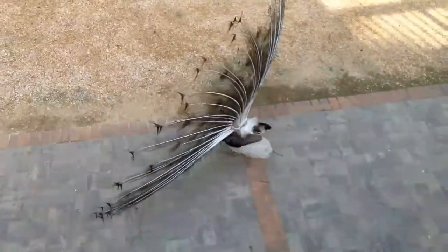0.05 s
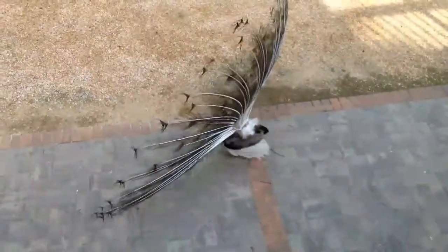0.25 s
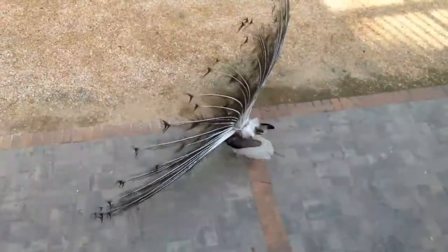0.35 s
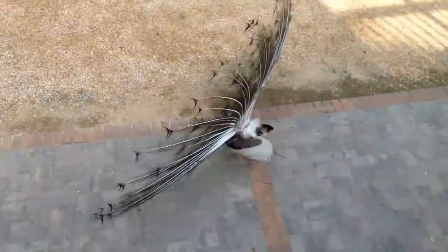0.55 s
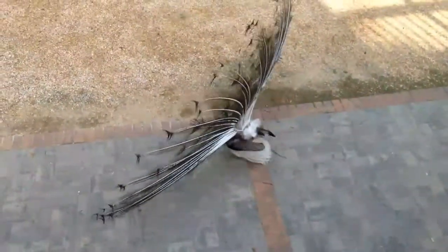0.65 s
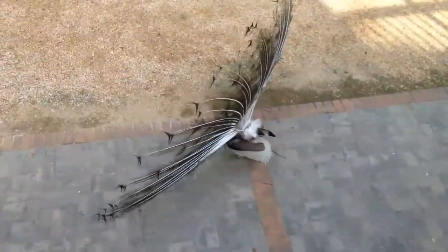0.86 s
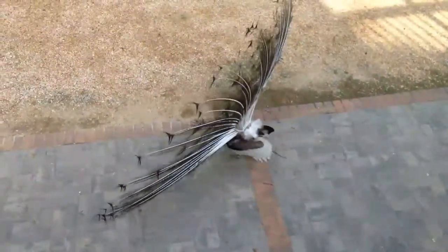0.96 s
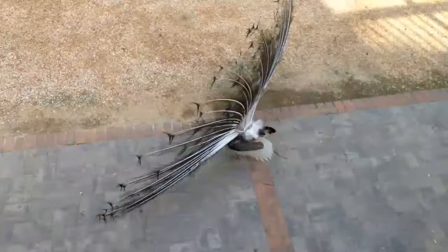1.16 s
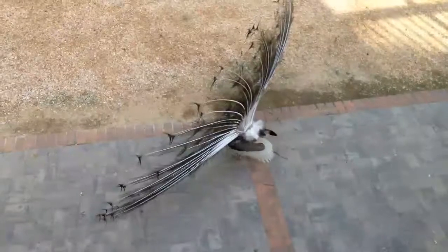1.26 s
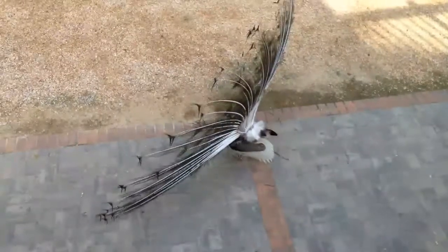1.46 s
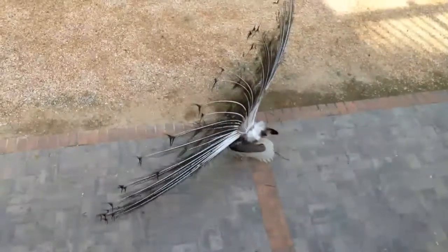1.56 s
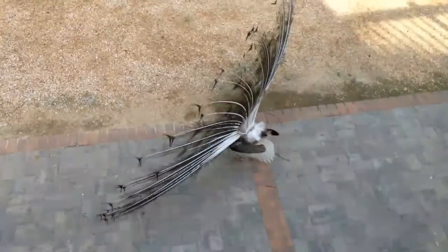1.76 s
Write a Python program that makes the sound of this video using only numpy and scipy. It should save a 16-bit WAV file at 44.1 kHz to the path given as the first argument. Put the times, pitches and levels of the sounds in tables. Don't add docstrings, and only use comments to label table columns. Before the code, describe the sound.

The fading ring of an earlier call opens a paved yard, then one strong, harmonic peacock cry bursts out and echoes away, leaving faint small birds, a late soft coo and low background hum.

```python
import sys
import numpy as np
from scipy import signal
from scipy.fft import rfft, irfft
from scipy.io import wavfile
from scipy.ndimage import uniform_filter1d

SR = 44100
rng = np.random.default_rng(int(sys.argv[2]) if len(sys.argv) > 2 else 0)


def generate_wav(signal):
    frames = np.transpose(np.atleast_2d(signal))
    scaled = np.clip(frames, -1, 1) * 32767
    pcm = np.round(scaled).astype(np.int16)
    wavfile.write(sys.argv[1], SR, pcm)


def magnitude_from_level(level_db):
    exponent = np.asarray(level_db, float) / 20
    return 10 ** exponent


N = 79380

# t/s, f/Hz, level/dB, brightness/(dB per octave), roughness/1
CRY = [
    (.135, 548.5, -36.5, -28, 1.1),
    (.2, 635.9, -19, -29, 0.9),
    (0.272, 704.2, -18, -16, 0.4),
    (0.351, 737, -5, 2.5, .3),
    (0.422, 758.2, -11.5, 7.2, 0.5),
    (.55, 749.9, -5.5, 4.5, 0.1),
    (0.629, 720, -16, 1.5, 0.4),
    (.755, 643.6, -18, 6, .6),
    (0.827, 497.6, -38, -12, 0.9),
]
# f/Hz, width/Hz, level/dB
THROAT = [(720, 790, -16.5), (1158, 163, 4), (1370, 650, -11.5), (1947, 180, 3), (2306.4, 271, 6.88),
          (2580, 114.2, 0), (2794.7, 70, 3), (3224, 200, -6), (3750, 390, -21.5), (4271, 880, -16),
          (6630, 1900, -30), (8860, 1700, -25), (11140, 5300, -35), (13400, 2000, -45.5)]
# t/s, level/dB
ECHOES = [(.0021, -14.5), (.0093, -15.5), (.0167, -17.5), (.0281, -11.5), (.041, -22.5)]
# f/Hz, t60/s
YARD_T60 = [(500, 1), (1300, 0.77), (2100, 0.65), (2800, 0.79), (4500, 0.97), (9000, 0.72), (15000, 0.58)]
# t/s, length/s, start f/Hz, end f/Hz, level/dB
CHIRPS = [(1.12, 0.056, 10250, 10500, -70), (1.133, 0.0099, 6650, 7230, -51.5),
          (1.143, 0.048, 7140, 7175, -55), (1.187, 0.036, 7430, 7240, -69.5),
          (1.369, 0.017, 3900, 4543, -61), (1.447, 0.0209, 4306, 4934, -69.5),
          (1.2, .009, 8150, 9700, -57.5), (1.208, 0.037, 9500, 10000, -70), (1.243, 0.012, 6300, 7300, -64),
          (1.251, 0.074, 7010, 7710, -55), (1.288, 0.033, 3750, 3730, -61),
          (1.424, 0.0267, 3430, 4033, -63.5), (1.641, 0.024, 4060, 4080, -59.5),
          (1.538, 0.0098, 11200, 10200, -81),
          (1.49, .15, 3560, 3690, -68), (1.765, .035, 3700, 4250, -66), (1.77, .026, 6950, 6900, -64),
           (1.17, .03, 3600, 3900, -68)]
# f/Hz, width/Hz, level/dB
HUM = [(217.7, 8, -64), (125.8, 12, -72.5)]
# f/Hz, level/dB
TOWN = [(30, -57.5), (100, -9.5), (200, -4.5), (400, -6.5), (900, -12), (3000, -15), (6000, -24),
        (15000, -35)]

START_S, END_S, ATTACK_S, RELEASE_S = 0.1538, 0.803, 0.0034, 0.0042
GLIDE_S, PITCH_WOBBLE = 0.045, 0.0005
JITTER_HZ, JITTER_RAD, JITTER_PARTIAL = 70, 0.035, 9
BREATH_DB, BRIGHT_FROM_HZ = -48, 7100
LEVEL_WOBBLE_DB, UPPER_WOBBLE_DB = 1.5, 4
LOWEST_STEADY, STEADY_AT_DB = 0.79, -15.5
BEAM_SHARE, BEAM_FROM_DB = 0.45, -18.5
EARLIER_CRY_S, EARLIER_CRY_DB = 0.94, -3.83
SLAP_DB, SLAP_FIRST_S, SLAP_LAST_S, SLAP_LOW_HZ = -4, 0.006, 0.08, 3800
YARD_DB, YARD_START_S = -11.5, 0.09
FAR_DB, FAR_T60_S, FAR_CUT_HZ = -28, 1.59, 5200
RUSTLE_S, RUSTLE_LENGTH_S, RUSTLE_DB = 1.2, 0.065, -60
RUSTLE_LOW_HZ, RUSTLE_HIGH_HZ = 3500, 10000
CHIRP_EDGE_S, CHIRP_GRAIN_DB, CHIRP_WET_DB, CHIRP_SLAP_DB = 0.004, 4, 8, -2
CHATTER_DB, CHATTER_LOW_HZ, CHATTER_HIGH_HZ, CHATTER_S = -84, 3400, 4600, 0.03
COO_S, COO_HZ, COO_DB, COO_OCTAVE_DB, COO_SWELL_S = 1.556, 392, -59.5, -16, 0.049
TOWN_DB = -58
MIC_LOW_HZ, TOP = 85, 0.97


def drift(rate, size):
    r = np.exp(-2 * np.pi * rate / SR)
    slow = signal.lfilter([1], [1, -2 * r, r * r], rng.standard_normal(size + SR))[SR:]
    return (slow - slow.mean()) / slow.std()


def at_hz(points, hz):
    table_hz, values = np.transpose(points)
    return np.interp(np.log(hz), np.log(table_hz), values)


def edges(t, start, end, attack, release):
    ramp = np.minimum((t - start) / attack, (end - t) / release)
    return np.sin(np.pi / 2 * np.clip(ramp, 0, 1)) ** 2


def bandpass(x, low_hz, high_hz):
    return signal.sosfilt(signal.butter(2, [low_hz, high_hz], "band", fs=SR, output="sos"), x)


def throat(hz):
    power = 0
    for top_hz, width, db in THROAT:
        power = power + magnitude_from_level(2 * db) / (1 + (2 * (hz - top_hz) / width) ** 2) ** 2
    return np.sqrt(power)


def cry():
    t = np.arange(SR) / SR
    s, *columns = np.transpose(CRY)
    curves = [uniform_filter1d(np.interp(t, s, c), int(GLIDE_S * SR)) for c in columns]
    pitch, level_db, tilt, rough = curves
    pitch = pitch * (1 + PITCH_WOBBLE * drift(3.08, size=SR))
    k = np.arange(1, 27)[:, None]
    tremble = JITTER_RAD * np.tanh((k / JITTER_PARTIAL) ** 2) * rough * drift(JITTER_HZ, size=SR)
    phase = 2 * np.pi * np.cumsum(pitch) / SR + tremble

    hz = k * pitch
    octaves_above = np.log2(np.maximum(hz / BRIGHT_FROM_HZ, 1))
    gains = throat(hz) * magnitude_from_level(tilt * octaves_above) * (hz < 0.4 * SR)
    wobble = np.array([drift(8, size=SR) for _ in k])
    gains = gains * magnitude_from_level((LEVEL_WOBBLE_DB + UPPER_WOBBLE_DB * (k > 3)) * wobble)
    gains = gains / np.sqrt(np.sum(gains ** 2, axis=0) / 2)
    gains[0] *= magnitude_from_level(-LOWEST_STEADY * (level_db - STEADY_AT_DB))

    air = irfft(rfft(rng.standard_normal(SR)) * throat(np.arange(SR // 2 + 1)), SR)
    breath = rough * magnitude_from_level(BREATH_DB) * air / air.std()
    voice = np.sum(gains * np.sin(k * phase), axis=0) + breath
    return voice * magnitude_from_level(level_db) * edges(t, START_S, END_S, ATTACK_S, RELEASE_S), level_db


def peacock(room):
    lead = int(EARLIER_CRY_S * SR)
    direct, level_db = cry()
    to_walls = direct * magnitude_from_level(-BEAM_SHARE * np.maximum(level_db - BEAM_FROM_DB, 0))
    pair = np.array([direct, to_walls])
    both = np.zeros((2, lead + N))
    both[:, :SR] += magnitude_from_level(EARLIER_CRY_DB) * pair
    both[:, lead:lead + SR] += pair
    path = room + slaps()
    for s, db in ECHOES:
        path[int(s * SR)] += magnitude_from_level(db)
    heard = both[0] + signal.fftconvolve(both[1], path)[:lead + N]
    return heard[lead:]


def slaps():
    out = np.zeros(2 * SR)
    when, size = rng.random((12, 2)).T
    delay = SLAP_FIRST_S + (SLAP_LAST_S - SLAP_FIRST_S) * when
    out[(delay * SR).astype(int)] = magnitude_from_level(SLAP_DB - 6.0 * when) * (2 * size - 1)
    high_pass = signal.butter(2, SLAP_LOW_HZ, "high", fs=SR, output="sos")
    return signal.sosfilt(high_pass, out + 1e-18)


def yard():
    t, out = np.arange(2 * SR) / SR, 0
    bands = 200 * 2 ** np.arange(0, 6.6, 0.5)
    white = rng.standard_normal((3, 2 * SR))
    for k, (low, high) in enumerate(zip(bands, bands[1:])):
        t60 = at_hz(YARD_T60, np.sqrt(low * high))
        out = out + bandpass(white[k % 2], low, high) * magnitude_from_level(-60 * t / t60)
    far = signal.sosfilt(signal.butter(2, FAR_CUT_HZ, fs=SR, output="sos"), white[2])
    far = far * magnitude_from_level(-60 * t / FAR_T60_S)
    build_up = np.clip(t / YARD_START_S, 0, 1)
    return (magnitude_from_level(YARD_DB) * out + magnitude_from_level(FAR_DB) * far) * build_up / np.sqrt(0.055 * SR)


def rustle():
    t = np.arange(N) / SR
    hiss = bandpass(rng.standard_normal(N), RUSTLE_LOW_HZ, RUSTLE_HIGH_HZ)
    envelope = edges(t, RUSTLE_S, RUSTLE_S + RUSTLE_LENGTH_S, 0.018, 0.02)
    return magnitude_from_level(RUSTLE_DB + 3.0 * drift(80, size=N)) * hiss / hiss.std() * envelope


def small_birds(room):
    t, out = np.arange(N) / SR, 0
    flutter = 1 + 0.004 * drift(60, size=N)
    when, pitch, bend, loud = rng.random((40, 4)).T
    start = CHATTER_LOW_HZ + (CHATTER_HIGH_HZ - CHATTER_LOW_HZ) * pitch
    end = start * (0.95 + 0.15 * bend)
    chatter = zip(when * N / SR, CHATTER_S * (0.5 + bend), start, end, CHATTER_DB + 6 * loud)
    for s, length, start_hz, end_hz, db in CHIRPS + list(chatter):
        glide = np.clip((t - s) / length, 0, 1) ** 0.78
        hz = (start_hz + (end_hz - start_hz) * glide) * flutter
        whistle = np.sin(2 * np.pi * np.cumsum(hz) / SR)
        out = out + magnitude_from_level(db) * edges(t, s, s + length, CHIRP_EDGE_S, CHIRP_EDGE_S) * whistle
    out = out * magnitude_from_level(CHIRP_GRAIN_DB * drift(120, size=N))
    path = magnitude_from_level(CHIRP_WET_DB) * room + magnitude_from_level(CHIRP_SLAP_DB) * slaps()
    return out + signal.fftconvolve(out, path)[:N]


def coo():
    t = np.arange(N) / SR
    phase = 2 * np.pi * np.cumsum(COO_HZ * (1 + 0.0021 * drift(6.8, size=N))) / SR
    swell = edges(t, COO_S, 3, COO_SWELL_S, 1) * magnitude_from_level(COO_DB + 2.0 * drift(10.7, size=N))
    return swell * (np.sin(phase) + magnitude_from_level(COO_OCTAVE_DB) * np.sin(2 * phase))


def town():
    hz = np.arange(1, N // 2 + 2) * SR / N
    hiss = irfft(rfft(rng.standard_normal(N)) * magnitude_from_level(at_hz(TOWN, hz)), N)
    out = magnitude_from_level(TOWN_DB + 0.8 * drift(3, size=N)) * hiss / hiss.std()
    for top_hz, width, db in HUM:
        resonance = 1 / (1 + (2 * (hz - top_hz) / width) ** 2)
        line = irfft(rfft(rng.standard_normal(N)) * resonance, N)
        out = out + magnitude_from_level(db) * line / line.std()
    return out


def scene():
    room = yard()
    return (peacock(room) + rustle() + small_birds(room) + coo() + town())[None]


def roll_off(x):
    return signal.sosfilt(signal.butter(12, 14960, fs=SR, output="sos"), x)


def record(dry):
    rounded = dry / (1 + (dry / TOP) ** 8) ** (1 / 8)
    high_pass = signal.butter(2, MIC_LOW_HZ, "high", fs=SR, output="sos")
    mix = signal.sosfilt(high_pass, rounded)
    return roll_off(mix)


dry = scene()
out = record(dry)
generate_wav(out)
```